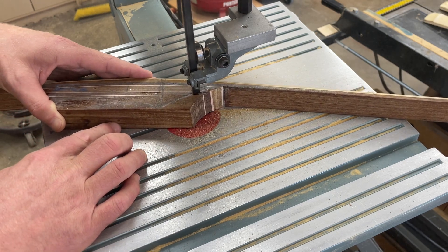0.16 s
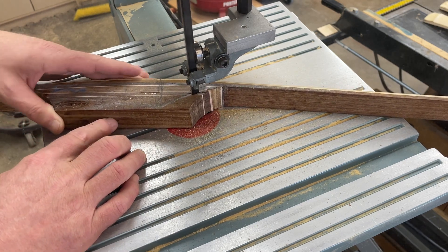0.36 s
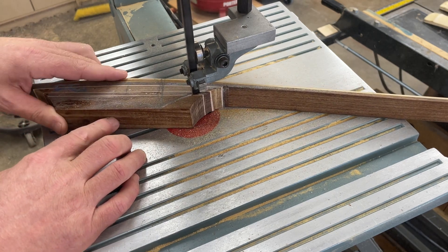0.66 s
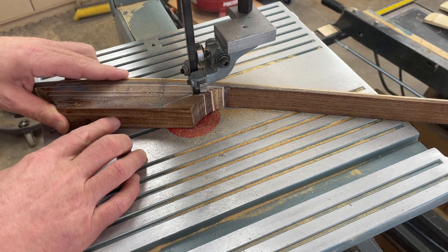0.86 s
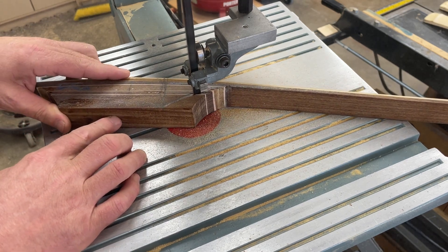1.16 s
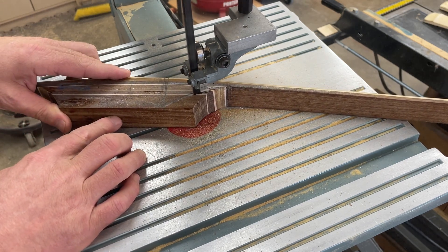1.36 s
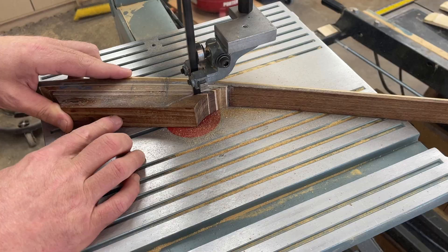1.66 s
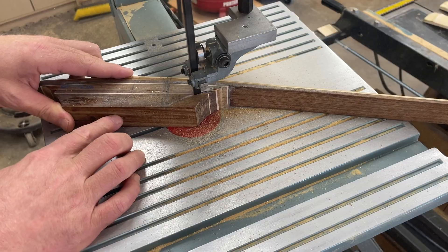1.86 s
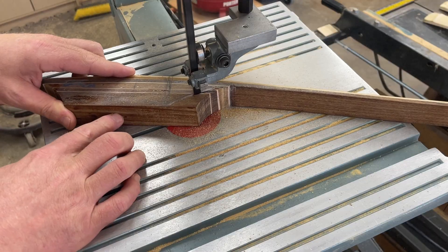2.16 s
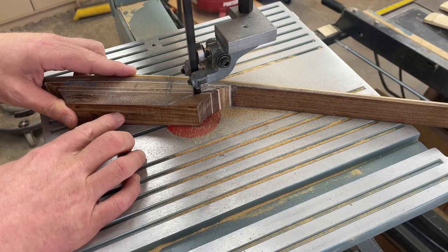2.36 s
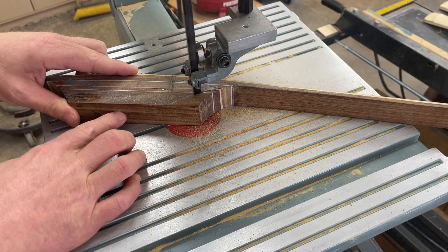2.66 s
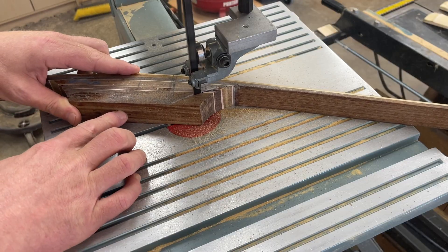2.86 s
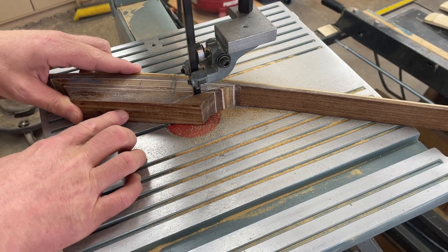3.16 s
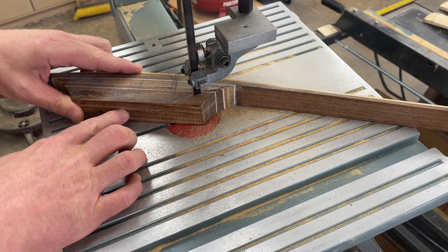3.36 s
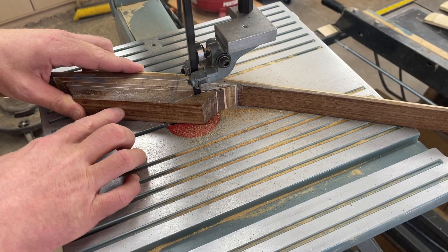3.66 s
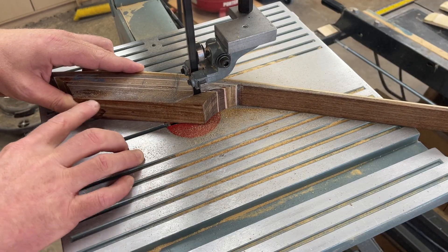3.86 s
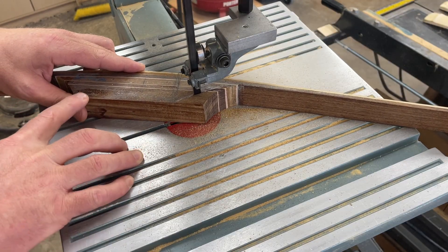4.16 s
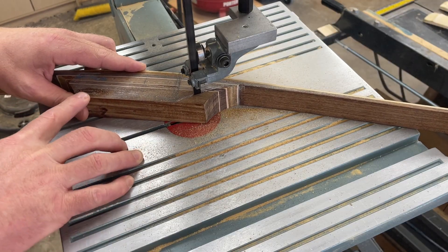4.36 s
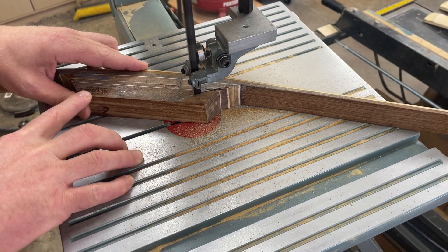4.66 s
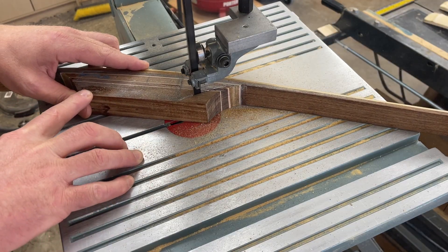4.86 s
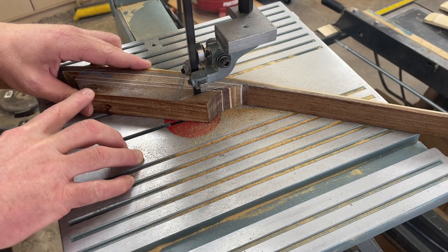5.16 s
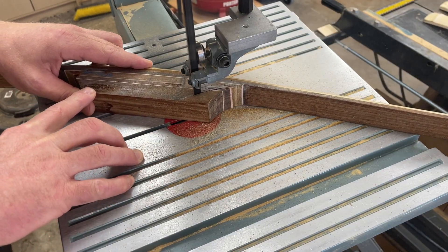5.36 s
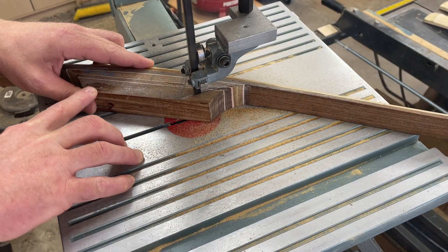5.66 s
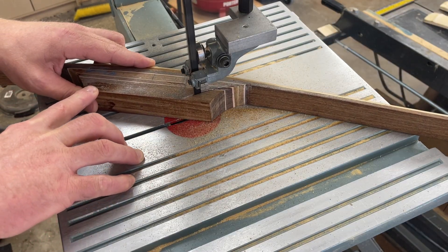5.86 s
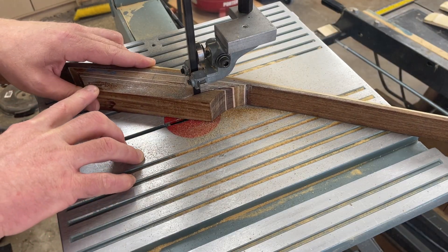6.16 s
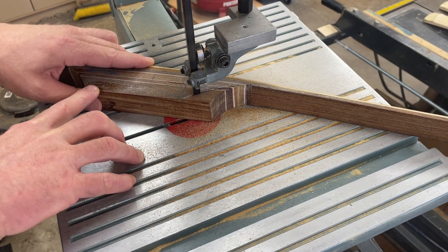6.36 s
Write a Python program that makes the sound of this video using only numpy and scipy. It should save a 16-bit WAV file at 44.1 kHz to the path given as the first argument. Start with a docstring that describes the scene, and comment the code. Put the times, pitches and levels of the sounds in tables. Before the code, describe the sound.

A bandsaw is already running and cutting hardwood, very close in stereo, with continuous low panel rumble and a wavering motor hum. A short harsh scrape opens the sound, then the cut lightens until about 0.7 s, with irregular snags. From there the gritty rasp pulses about six or seven times a second as uneven blade spots come round. Around 1.1 s the blade starts chattering in very short, piercing metallic shrieks, thickest and loudest from 1.7 to 2.9 s, with rough squeals an octave higher. By 3.3 s the shrieks thin out and the cut calms to rasp, wooden ringing and steady tooth whine. At about 4.3 s chatter returns, more moderate and scattered. From 4.7 s brief lower, nearly pure pips join, strongest near 6.1 s. The bite eases slightly toward 6.5 s, still running.

```python
"""In a workshop, on a metal table, a bandsaw cuts a thick hardwood block close to a two-port microphone.
Under everything, jolted panels rumble as filtered noise and the motor hums as wavering sine waves.
The teeth whine as multiples of their passing rate; noise makes the block and the blade ring.
The blade chatters in short shrieks, each a tone that swells and fades, and chips tear as grainy noise.
Uneven spots of the blade loop bite harder as they come round, and the rasp and rings swell with them."""
import sys
import numpy as np
from scipy import signal
from scipy.fft import rfft, irfft
from scipy.io import wavfile
from scipy.ndimage import uniform_filter1d

SR = 44100
rng = np.random.default_rng(int(sys.argv[2]) if len(sys.argv) > 2 else 0)


def log_audio(samples):
    """Write samples as a 16-bit WAV file to the path given in sys.argv[1]."""
    # one column per channel
    frames = np.atleast_2d(samples).T
    # limit to full scale, then quantise
    limited = np.clip(frames, -1, 1)
    pcm = np.round(limited * 32767).astype(np.int16)
    wavfile.write(sys.argv[1], SR, pcm)


N = 287091
T = np.arange(N) / SR  # time of each sample in seconds


def amp(db):
    """Turn dB into a plain multiplier."""
    return 10 ** (np.asarray(db) / 20)


def evened(x):
    """Scale a sound to an effective (RMS) level of 1."""
    return x / np.sqrt(np.mean(x ** 2) + 1e-20)


def curves(rows):
    """Join each column after the first by straight lines in time."""
    s, *columns = np.transpose(rows)
    return [np.interp(T, s, column) for column in columns]


def over_hz(points):
    """Read a table at every frequency of a full-length transform, spaced as the ear hears pitch."""
    hz, value = np.transpose(points)
    return np.interp(np.log(np.fft.rfftfreq(N, 1 / SR) + 1), np.log(hz + 1), value)


def coloured(x, points):
    """Give a sound the balance of low and high in a table."""
    return evened(irfft(rfft(x) * amp(over_hz(points)), N))


def ring(x, hz, width):
    """A steep resonance: two passes through a filter that rings at hz."""
    radius = np.exp(-np.pi * width / SR)
    poles = [1, -2 * radius * np.cos(2 * np.pi * hz / SR), radius * radius]
    once = signal.lfilter([1, -1], poles, x)
    return evened(signal.lfilter([1, -1], poles, once))


def high_part(x, hz):
    """Only the sound above hz, with no delay."""
    return signal.sosfiltfilt(signal.butter(4, hz, "high", fs=SR, output="sos"), x)


def wander(rate_hz):
    """Smooth chance: random points, twice rate_hz of them a second, joined by lines."""
    s = np.arange(0, T[-1] + 1, .5 / rate_hz)
    return np.interp(T, s, rng.standard_normal(len(s)))


def snaps(per_s, fall_s):
    """Chance of unit size that jumps up at once and sinks slowly."""
    jumps = rng.exponential(1, N) * (rng.random(N) < per_s / SR)
    x = signal.lfilter([1], [1, -np.exp(-1 / (fall_s * SR))], jumps)
    return evened(x - x.mean())


def field(shape, frames, bins):
    """Random patches over frequency and time, of unit size."""
    patches = uniform_filter1d(rng.standard_normal(shape), bins, 0)
    return evened(uniform_filter1d(patches, frames, 1))


# One uneven spot bites once in each turn of the wheel. Each row: time in seconds, turns made so far.
WHEEL_TURNS = [(0.742, 0), (3.837, 20), (6.451, 37)]
# How hard that spot bites. Each row: time in seconds, extra rasp in dB, extra knock into the block in dB.
# Each sound applies its own share of these extras.
SPOT_BITE = [(0.74, 8, 6), (1.2, 7.5, 7), (1.67, 9.5, 10), (1.9, 4.5, 1), (2.3, 5, 10), (2.75, 8.5, 10),
             (3.3, 7, 10.5), (4.15, 7, 9.5), (4.45, 5.5, 4.5), (5.05, 5, 12.5), (5.55, 5, 6),
             (6.45, 5.5, 7.5)]
# Further bites of the blade, each at its own listed time. Each row: time in seconds, extra rasp in dB, extra
# knock in dB. The same shares apply, and values below zero add nothing.
OTHER_BITES = [(0.141, 6, 3), (0.311, 8.5, 4), (0.398, 4, 8), (0.463, 6, -3), (0.566, 5, 3), (0.621, -3, 9),
               (1.11, 4.5, -7), (1.265, 5.5, -5), (2.386, 5, 5), (2.547, 4, -15), (2.681, 3, -5), (2.83, 9.5, -4),
               (2.984, 4, -3), (3.124, 5.5, 5), (4.956, 6, -2), (4.703, 3, 1), (4.849, 3, 4), (5.006, 1.5, -4),
               (5.154, 3, -2), (5.325, 4, -7), (5.56, 4, -6), (5.636, 5, -4), (5.78, 2.5, 0), (5.86, 7.5, 9),
               (5.936, 5, 2), (6.082, 10.5, -5), (6.168, 6.5, 5), (6.382, 3.5, 9)]


def all_bites():
    """The spot that comes round with the wheel, then the further bites."""
    s, turns = np.transpose(WHEEL_TURNS)
    times = np.interp(np.arange(turns[-1] + 1), turns, s)
    at, *extra = np.transpose(SPOT_BITE)
    spot = np.transpose([times] + [np.interp(times, at, e) for e in extra])
    return np.vstack([spot, OTHER_BITES])


def bites(column, rise=0.0069, hold=0.0043, fall=0.022):
    """Extra dB over time (column 1 rasp, 2 knock): each bite grips quickly, holds, lets go slowly (seconds)."""
    out = np.zeros(N)
    for row in all_bites():
        near = slice(max(round((row[0] - .05) * SR), 0), round((row[0] + .15) * SR))
        u = T[near] - row[0]
        grip = np.exp(-(np.minimum(u + hold, 0) / rise) ** 2)
        release = np.cosh(np.maximum(u - hold, 0) / fall)
        out[near] = np.maximum(out[near], row[column] * grip / release)
    return out


# Balance of the cabinet noise. Each row: frequency in Hz, relative level in dB per Hz.
CABINET_BALANCE = [(30, -48), (65, -18.5), (100, -15.5), (160, -22), (200, -7.5), (400, -8), (620, -5),
                   (720, -41), (1500, -18.5), (4000, -31)]
# Rings of the panels. Each row: frequency in Hz, width in Hz, level against the cabinet noise in dB.
PANELS = [(208, 20, -11), (240, 34, -13), (323, 12, -8), (383, 22, -6), (495, 20, -11), (590, 40, -13),
          (645, 22, -12), (740, 25, -16), (815, 35, -19)]
# Cabinet rumble, before a slight wander. Each row: time in seconds, level in dB.
RUMBLE = [(0.05, -36.5), (0.25, -41), (1.35, -35.5), (2.1, -39.5), (3.0, -40.5), (4.65, -37), (6.4, -38)]


def cabinet():
    """Wheels and motor shake the panels: noise, stronger at each knock, makes them ring."""
    shake = rng.standard_normal(N) * amp(0.33 * bites(2, 0.012, 0.0065, 0.016))
    signs = rng.choice([-1., 1.], N)  # the panels get the same jolts, unrelated in detail
    panels = sum(amp(db) * ring(shake * signs, hz, width) for hz, width, db in PANELS)
    body = coloured(shake, CABINET_BALANCE) + panels
    return amp(curves(RUMBLE)[0] + 0.16 * wander(8)) * evened(body)


HUM_HZ = 119.8
# Which multiples of the hum pitch sound; each entry is one multiple.
HUM_MULTIPLES = [1, 2, 5]
# Motor hum, before it wavers. Each row: time in seconds, then the levels of multiples 1, 2 and 5 in dB.
HUM_LEVELS = [(0.0, -68, -56, -64), (0.13, -57, -45, -48.5), (0.75, -54, -44.5, -40.5),
              (0.9, -55.5, -47, -44.5), (1.35, -51, -41.5, -54), (1.8, -52, -45.5, -50.5),
              (3.4, -63.5, -47, -47), (4.2, -59, -43.5, -52), (6.0, -61.5, -44.5, -50),
              (6.51, -53, -47.5, -63)]


def motor_hum():
    """The motor hums at twice the mains rate: sine waves that waver in level and phase."""
    out = np.zeros(N)
    for db, k in zip(curves(HUM_LEVELS), HUM_MULTIPLES):
        level = amp(db + 3.2 / k ** .5 * wander(12))
        out += level * np.sin(2 * np.pi * k * HUM_HZ * T + .75 * wander(12))
    return np.sqrt(2) * out


SPELL_FADE_DB_PER_S = 100


def spells(rows, floor_db):
    """A level in dB that rises from the floor around each spell and sinks back after it."""
    out = floor_db + 0 * T
    for start, end, db in rows:
        outside_s = np.maximum(np.maximum(start - T, T - end), 0)
        out = np.maximum(out, db - SPELL_FADE_DB_PER_S * outside_s)
    return out


# The blade slows under load. Each row: time in seconds, teeth passing in Hz.
TEETH = [(0, 1064), (.6, 1072), (.8, 1069), (1.0, 1060), (1.5, 1061), (1.9, 1057), (2.6, 1055.5),
         (3.4, 1058), (3.95, 1064), (4.4, 1060), (5.3, 1062), (5.9, 1062), (6.15, 1066), (6.3, 1073),
         (6.51, 1073)]
# Spells in which one multiple of the tooth rate sings out, listed under the number of that multiple.
# Each row: start in seconds, end in seconds, level in dB before flutter and bites.
SPELLS = {1: [(0.6, 1.1, -61), (2.0, 4.5, -55), (4.6, 5.4, -55), (5.65, 5.8, -49)], 2: [(0.085, 0.12, -45),
          (0.75, 0.86, -48.5), (0.97, 1.01, -42.5), (1.2, 1.55, -46), (2.2, 2.9, -50)],
          3: [(0.95, 1.6, -44.5), (2.7, 3.3, -50), (4.0, 4.35, -46.5), (4.5, 5.7, -44)],
          5: [(0.75, 1.5, -51), (1.8, 3, -53), (4.3, 5.5, -57), (5.7, 6.5, -58)], 6: [(0, .2, -53),
          (0.7, 1.5, -49.5), (1.5, 2.45, -44.5), (2.5, 2.9, -48.5), (3, 3.7, -52.5), (4.2, 4.6, -56.5)],
          9: [(1.5, 1.8, -58), (2.0, 3.0, -54.5), (3.8, 4.3, -62), (5.5, 6.5, -53)], 10: [(1.5, 2.1, -62),
          (3.4, 4.7, -56), (4.7, 6.5, -60.5)], 11: [(0.75, 0.95, -56), (1.8, 2.3, -56), (4.1, 4.5, -66),
          (5.6, 6.0, -63), (6.3, 6.5, -55)], 8: [(5.3, 6.3, -50)], 12: [(2.7, 3.0, -57), (4.95, 6.0, -53),
          (6.3, 6.5, -63)]}
LOWEST_DB, FAINT_DB, FAINT_FOLLOWS = -59, -68, .8  # floors of multiple 1 and the rest; share of rasp followed
CUTTING_DB = -45  # rasp level at which the faint floor is FAINT_DB


def whine():
    """Multiples of the tooth rate; uneven tooth spacing blurs and flutters them."""
    rasp_db, hz = curves(CUT)[0], curves(TEETH)[0]
    faint_db = FAINT_DB + FAINT_FOLLOWS * (rasp_db - CUTTING_DB)
    turns = np.cumsum(hz * (1 + .0005 * wander(25))) / SR
    bite_db, out = bites(1), np.zeros(N)
    for k in range(1, 13):
        floor_db = LOWEST_DB if k == 1 else faint_db
        db = spells(SPELLS.get(k, []), floor_db) + 1.5 * wander(2.3) + .4 * bite_db
        blur = (0.6 + 0.04 * k) * wander(60)
        out += amp(db + 2.5 * wander(35)) * np.cos(2 * np.pi * k * turns + blur)
    return np.sqrt(2) * out


def swelling_tones(rows, rough):
    """Short tones that swell and fade, roughened by quick chance."""
    out = np.zeros(N)
    for s, db, ms, hz in rows:
        length = ms / 1000
        t = np.arange(-length / 2, length / 2, 1 / SR)
        swell = amp(db) * np.cos(np.pi * t / length) ** 2
        out[round((s + t[0]) * SR):][:len(t)] += swell * np.sin(2 * np.pi * hz * t)
    return out * (1 + rough * wander(300)) / np.hypot(1, rough)


# Pips near the tooth rate and at a ring of the blade.
# Each row: middle in seconds, peak in dB before roughening, length in ms, pitch in Hz.
PIPS = [(2.393, -40.0, 34, 3850), (2.622, -37.5, 26, 3890), (2.679, -37.0, 33, 3880),
        (2.773, -40.0, 41, 3880), (2.83, -35.0, 34, 3850), (4.311, -36.5, 22, 3870),
        (4.467, -40.0, 20, 3880), (4.494, -41.0, 20, 3850), (4.564, -38.5, 21, 3850),
        (4.708, -36.0, 20, 3850), (4.76, -36.0, 59, 1070), (4.861, -35.0, 52, 3880),
        (4.951, -36.0, 57, 1060), (5.014, -36.5, 36, 3880), (5.069, -34.0, 27, 1060),
        (5.158, -38.5, 31, 3870), (5.238, -39.5, 34, 3860), (5.377, -36.5, 22, 1050),
        (5.561, -34.5, 70, 1060), (5.636, -40.0, 31, 3860), (5.642, -34.5, 52, 1060),
        (5.674, -41.0, 28, 3840), (5.854, -31.5, 61, 1060), (5.867, -39.5, 37, 3900),
        (5.938, -33.0, 60, 1060), (6.089, -28.0, 70, 1060), (6.096, -38.5, 34, 3860),
        (6.163, -34.0, 58, 1070), (6.384, -36.0, 68, 1060)]


def pips():
    """Short, nearly pure tones at the tooth rate and at a ring of the blade."""
    return swelling_tones(PIPS, .2)


# Rough squeals an octave over the hardest bursts.
# Each row: middle in seconds, peak in dB before roughening, length in ms, pitch in Hz.
SQUEALS = [(1.713, -31.5, 26, 5480), (1.868, -33.5, 33, 5480), (1.941, -35.5, 20, 5430),
           (2.012, -35.0, 35, 5430), (2.166, -35.5, 31, 5420), (2.385, -32.5, 34, 5460),
           (2.474, -34.5, 50, 5450), (2.538, -29.0, 39, 5480), (2.631, -36.5, 22, 5440),
           (2.838, -31.0, 47, 5490)]


def squeals():
    """Very rough short tones, an octave above the chatter."""
    return swelling_tones(SQUEALS, .9)


# The rings: chatter, upper and lower of the block, lower and upper of the blade, then four of the kerf.
# Each row: frequency in Hz, width in Hz, flutter in dB.
RINGS = [(2725, 250, 1.5), (1543, 24, .6), (1440, 50, .8), (1888, 40, 3.5), (3880, 70, 4), (5050, 900, 1),
         (9250, 500, 1.5), (4945, 70, 5), (4100, 70, 2.5)]
# Rings of the block. Each row: time in seconds, upper ring in dB, lower ring in dB.
BLOCK = [(0.0, -61, -46), (0.12, -48.5, -50), (0.3, -54, -59), (0.7, -52, -59), (0.75, -42, -43),
         (1.1, -44.5, -40), (1.8, -40.5, -42.5), (3.2, -44.5, -45.5), (3.75, -49.5, -47), (4.128, -49, -40),
         (6.1, -43.5, -41), (6.4, -57, -39.5), (6.51, -50, -53)]
# The blade's two rings. Each row: time in seconds, lower ring in dB, upper ring in dB.
BLADE_LEVELS = [(0.0, -53, -54), (0.5, -55, -68), (0.75, -57, -70), (1.25, -50, -54), (1.8, -53, -69),
                (2.67, -44, -45), (3.299, -56, -57), (3.75, -61, -56), (4.3, -53, -46.5), (5.05, -52, -49),
                (5.3, -50, -55), (5.9, -50, -50), (6.15, -53, -50), (6.3, -59, -64)]
# Bright rings of the kerf. Each row: time in seconds, then two broad hisses and two narrow rings, all in dB.
BRIGHT = [(0, -50, -60, -71, -50), (.4, -52, -52, -68, -55), (.7, -58, -62, -66, -60),
          (.8, -53, -61, -47, -64), (1.5, -51, -60, -51, -64), (1.8, -48, -57, -68, -60),
          (2.3, -41, -54, -66, -62), (2.9, -45.5, -61, -57, -64), (3.3, -50, -58, -64, -59),
          (3.9, -67, -63, -69, -67), (4.5, -53, -44, -60, -58), (5.1, -55, -51, -62, -53),
          (5.9, -62, -57, -65, -52), (6.5, -67, -66, -74, -62)]
CHATTER_LAG_S, CHATTER_PUSH = 0.012, 0.4  # the blade shakes hardest a moment after each bite; share of bite


def rings():
    """Noise-driven resonances of block and blade, pushed harder after each bite and fluttering in beads."""
    late_bites = np.roll(bites(1), round(CHATTER_LAG_S * SR))
    push = rng.standard_normal(N) * amp(CHATTER_PUSH * late_bites)
    levels = curves(CUT)[1:] + curves(BLOCK) + curves(BLADE_LEVELS) + curves(BRIGHT)
    out = np.zeros(N)
    for db, (hz, width, flutter_db) in zip(levels, RINGS):
        beads = amp(flutter_db * wander(40)) * ring(push, hz, width)
        out += amp(db) * evened(beads)
    return out


# The loudest chatter bursts of the blade; the finished swing is 1 dB softer than these peaks.
# Each row: middle in seconds, peak in dB, length in ms, pitch in Hz.
SHRIEKS = [(0.014, -21.5, 11, 2680), (1.08, -20.5, 10, 2770), (1.114, -16.0, 16, 2740),
           (1.123, -18.0, 8, 2720), (1.133, -23.5, 7, 2730), (1.171, -23.0, 13, 2730),
           (1.205, -23.5, 7, 2730), (1.216, -22.5, 15, 2730), (1.232, -16.5, 11, 2720),
           (1.244, -22.0, 7, 2720), (1.26, -16.5, 27, 2730), (1.265, -17.0, 7, 2680),
           (1.28, -16.5, 12, 2750), (1.291, -22.0, 9, 2710), (1.299, -23.0, 7, 2700),
           (1.396, -22.0, 16, 2710), (1.425, -19.5, 12, 2710), (1.545, -17.0, 23, 2740),
           (1.564, -20.5, 7, 2700), (1.575, -19.0, 9, 2690), (1.674, -19.5, 11, 2730),
           (1.685, -23.5, 7, 2750), (1.695, -14.5, 13, 2730), (1.708, -9.5, 10, 2710),
           (1.718, -20.5, 7, 2730), (1.785, -16.0, 9, 2710), (1.83, -22.5, 12, 2760),
           (1.843, -21.5, 12, 2750), (1.859, -16.5, 27, 2720), (1.872, -14.0, 13, 2790),
           (1.884, -21.5, 7, 2740), (1.89, -21.5, 12, 2780), (1.923, -23.5, 7, 2730),
           (1.937, -19.5, 20, 2730), (1.955, -23.5, 7, 2720), (1.995, -23.0, 7, 2730),
           (2.01, -12.0, 28, 2730), (2.029, -18.0, 8, 2730), (2.053, -22.5, 10, 2770),
           (2.084, -21.0, 16, 2710), (2.16, -16.0, 16, 2730), (2.17, -16.5, 13, 2720),
           (2.25, -22.0, 9, 2700), (2.312, -18.5, 7, 2780), (2.32, -16.5, 36, 2740),
           (2.37, -17.0, 15, 2730), (2.385, -13.5, 15, 2720), (2.396, -16.0, 9, 2740),
           (2.406, -18.0, 7, 2730), (2.417, -21.0, 7, 2770), (2.462, -15.0, 12, 2730),
           (2.474, -11.0, 18, 2720), (2.523, -19.0, 29, 2720), (2.538, -12.5, 14, 2720),
           (2.549, -14.0, 11, 2740), (2.563, -18.5, 13, 2710), (2.611, -18.0, 16, 2710),
           (2.625, -14.5, 22, 2720), (2.639, -22.5, 14, 2680), (2.669, -17.5, 19, 2720),
           (2.686, -18.5, 8, 2690), (2.775, -18.5, 12, 2700), (2.819, -16.0, 18, 2690),
           (2.837, -12.5, 12, 2710), (2.849, -16.5, 9, 2710), (2.859, -22.5, 7, 2690),
           (2.895, -20.5, 16, 2720), (2.938, -22.0, 21, 2700), (2.984, -21.0, 14, 2750),
           (3.091, -22.0, 10, 2730), (3.135, -21.0, 9, 2720), (3.246, -22.0, 8, 2640),
           (4.315, -21.0, 7, 2750), (4.328, -16.0, 17, 2730), (4.336, -17.5, 7, 2710),
           (4.479, -15.5, 18, 2730), (4.497, -22.0, 8, 2730), (4.555, -21.5, 12, 2720),
           (4.629, -22.5, 9, 2780), (4.64, -21.5, 21, 2730), (4.702, -20.0, 18, 2750),
           (4.78, -20.5, 11, 2740), (4.792, -21.5, 11, 2740), (4.942, -23.0, 11, 2750),
           (5.002, -22.5, 9, 2720), (5.084, -21.5, 7, 2690), (5.094, -19.0, 15, 2740),
           (5.254, -22.5, 7, 2730), (5.319, -23.0, 7, 2660), (5.453, -23.0, 12, 2720),
           (5.572, -21.5, 17, 2670), (5.601, -21.5, 11, 2720), (5.616, -22.5, 11, 2740),
           (5.871, -17.5, 10, 2710), (5.901, -22.5, 7, 2750)]
SHRIEK_HZ, SHRIEK_SPREAD_HZ = 2725, 60  # pitch of the lesser bursts
SMALL_PER_S, SMALL_MS = 7, 12  # how many lesser bursts, and their middle length
SMALL_OVER_DB, SMALL_SPREAD_DB = 4, 3  # how far they stand over the chatter
SQUEAL_HZ, SQUEAL_WIDTH_HZ = 5470, 380


def burst_rows():
    """The listed bursts, then lesser ones at random moments, in the same columns."""
    chance = rng.random((round(SMALL_PER_S * T[-1]), 4))
    s = .05 + chance[:, 0] * (T[-1] - .1)
    chatter_db = curves(CUT)[1][(s * SR).astype(int)]
    db = chatter_db + SMALL_OVER_DB + SMALL_SPREAD_DB * (2 * chance[:, 1] - 1)
    ms = SMALL_MS * (.5 + chance[:, 2])
    hz = SHRIEK_HZ + SHRIEK_SPREAD_HZ * (2 * chance[:, 3] - 1)
    return np.vstack([SHRIEKS, np.transpose([s, db, ms, hz])])


def shrieks():
    """One self-excited swing of the blade swells at each burst; hard swings set off a squeal an octave up."""
    swing, pitch = np.zeros(N), np.full(N, float(SHRIEK_HZ))
    for s, db, ms, hz in burst_rows():
        length = ms / 1000
        t = np.arange(-length / 2, length / 2, 1 / SR)
        start = round((s + t[0]) * SR)
        near = slice(start, start + len(t))
        swell = amp(db) * np.cos(np.pi * t / length) ** 2
        pitch[near] = np.where(swell > swing[near], hz, pitch[near])  # the stronger burst sets the pitch
        swing[near] = np.maximum(swell, swing[near])
    out = amp(-1) * swing * (1 + .1 * wander(250)) * np.sin(2 * np.pi * np.cumsum(pitch) / SR)
    power = out ** 2  # squaring a tone doubles its pitch
    rough = 4 * uniform_filter1d(power, size=900, origin=400) * rng.standard_normal(N)
    squeal = ring(power + rough, SQUEAL_HZ, SQUEAL_WIDTH_HZ)
    grit = coloured(np.abs(out) * rng.standard_normal(N), RASP_BALANCE)  # the blade scrapes the kerf walls
    return out + amp(-54.5) * squeal + amp(-51.0) * grit


# The cut as the block is fed. Each row: time in seconds, rasp in dB before bites, chatter ring in dB.
CUT = [(0.0, -29.5, -36), (0.02, -33.5, -30), (0.075, -39.5, -40), (0.11, -39.5, -51), (0.501, -44.5, -61),
       (0.71, -39, -52), (0.779, -38.5, -49.5), (1.1, -34, -31), (1.45, -35.5, -36), (1.75, -38, -30),
       (2.1, -36, -32.5), (2.54, -37, -29.5), (2.8, -39, -33), (3.399, -40, -37), (3.8, -41.5, -42),
       (4.15, -39, -37.5), (4.4, -36, -33.5), (4.95, -37, -33), (5.75, -37, -33), (6.1, -39, -36.5),
       (6.3, -41.5, -42), (6.51, -42, -41)]
# Balance of the rasp. Each row: frequency in Hz, relative level in dB per Hz.
RASP_BALANCE = [(150, -30), (450, -12), (900, -1), (1300, 0), (1750, -7), (2300, -1), (3200, 3), (3600, -4),
                (4900, -5), (5700, -6), (6300, -4), (7000, -6), (10000, -7.5), (12500, -8), (13500, -11.5),
                (14300, -10), (15800, -8)]
# Steady rings that the rasp excites, before a slow wander.
# Each row: frequency in Hz, width in Hz, level against the rasp in dB.
BLADE_RINGS = [(985, 60, -16), (2285, 50, -19), (2535, 45, -15), (3330, 120, -13), (4665, 70, -20),
               (6000, 110, -23), (8020, 130, -24), (11600, 250, -24), (14850, 130, -22)]
# Treble against the rasp. Each row: time in seconds, level below AIR_HZ in dB, level above it in dB.
TREBLE = [(0, -11, -10), (.4, 6, -9), (.75, -5.5, -9), (1.5, -5, -3.5), (2, -1.5, -5.5), (2.5, 1, 3),
          (3.3, -1, -3.5), (3.9, 2.5, -2), (4.5, 1, -1.5), (5.2, -1, 1), (5.9, -0.5, -1), (6.5, 0, -6)]
SIZZLE_HZ, SIZZLE_SHARE = 8600, 0.45  # above this, each bite brings a sharper sizzle; share of bite
AIR_HZ = 11000
CRACKLE_DB = 1.8  # single chips stand out in the treble
KNOCK_S = (.006, .005, .018)  # rise, hold, fall in seconds


def rasp():
    """Chips tearing: grainy, patchy noise through the kerf and the blade's rings."""
    grain = rng.standard_normal(N) * amp(1.3 * wander(700) + 1.17 * snaps(60, .012))
    z = signal.stft(grain, nperseg=256, noverlap=192)[2]
    patchy = z * amp(.8 * field(z.shape, frames=12, bins=8))
    grain = signal.istft(patchy, nperseg=256, noverlap=192)[1][:N]
    tear = coloured(grain, RASP_BALANCE)
    for hz, width, db in BLADE_RINGS:
        tear = tear + amp(db + 1.2 * wander(1.95)) * ring(grain[::-1], hz, width)  # reversed: unrelated
    low = np.clip(1 - np.fft.rfftfreq(N, 1 / SR) / 3000, 0, 1)  # knocks are felt in the block, low down
    knock = irfft(rfft(tear) * low, N)
    fizz = high_part(tear, SIZZLE_HZ)
    air = high_part(fizz, AIR_HZ)
    low_db, high_db = curves(TREBLE)
    treble = (fizz - air) * amp(low_db) + air * amp(high_db)
    sharp_bites = bites(1, 0.0012, 0.0011, 0.0037)
    sizzle = treble * amp(SIZZLE_SHARE * sharp_bites + CRACKLE_DB * snaps(120, 0.0064))
    upper = tear - knock - fizz + sizzle  # the sizzle takes the place of the plain treble
    bitten = upper * amp(0.81 * bites(1)) + knock * amp(bites(2, *KNOCK_S))
    return amp(curves(CUT)[0]) * bitten


def scene():
    """The saw heard directly, and as scattered by its many surfaces and the shop: drifting phases."""
    saw = cabinet() + motor_hum() + whine() + pips() + squeals() + rings() + shrieks() + rasp()
    z = signal.stft(saw, nperseg=1024, noverlap=768)[2]
    drift = np.angle(field(z.shape, frames=6, bins=6) + 1j * field(z.shape, frames=6, bins=6))
    scattered = signal.istft(z * np.exp(1j * drift), nperseg=1024, noverlap=768)[1][:N]
    return np.array([saw, scattered * saw.std() / scattered.std()])


# Phase between the ports. Each row: frequency in Hz, lead of the left port in radians.
LEFT_LEAD = [(0, 0), (600, 0.1), (860, 0.6), (1380, 0.1), (1720, 0.6), (2240, 0.1), (2760, 1.8),
             (3270, 1.4), (3880, 0.1), (4130, -0.0), (4650, 0.9), (4910, 0.5), (5250, 1.1), (5510, 0.2),
             (5940, -0.5), (6370, -0.6), (6720, -1.0), (7580, -3.12), (8870, -3.17), (9050, -4.2),
             (10500, -6.1), (12900, -6.6), (13700, -9.35), (15500, -9.5)]
# How alike the ports hear. Each row: frequency in Hz, likeness from 0 (unrelated) to 1 (the same).
LIKENESS = [(60, .92), (250, .99), (600, .7), (1450, .93), (1800, .6), (2350, .5), (2750, .88), (4500, .5),
            (7100, .65), (7600, 1), (8850, 1), (9150, .75), (10900, 1), (12300, 1), (13400, .6), (13900, 1)]
# Balance of the ports. Each row: frequency in Hz, left over right in dB.
LEFT_LOUDER = [(60, -0.5), (99, -1.5), (160, -1.5), (270, -1.0), (450, -1.5), (740, 0.5), (1220, 0.5),
               (2010, 1.0), (2720, 4.0), (3330, 3.0), (5500, 3.0), (7600, 0.0), (15000, 0.0)]
EDGE_HZ = 15850  # top of the band


def record(dry):
    """Two ports: the right hears part direct, part scattered sound, turned in phase; then the band limit."""
    direct, scattered = rfft(dry, axis=1)
    same = np.clip(over_hz(LIKENESS), 0, 1)
    mixed = same * direct + np.sqrt(1 - same ** 2) * scattered
    right = mixed * np.exp(-1j * over_hz(LEFT_LEAD)) * amp(-over_hz(LEFT_LOUDER))
    pair = np.array([dry[0], irfft(right, N)])
    band = signal.firwin(1023, EDGE_HZ, window=("kaiser", 10), fs=SR)
    return signal.oaconvolve(pair, band[None], "same")


dry = scene()
out = record(dry)
log_audio(out)
```